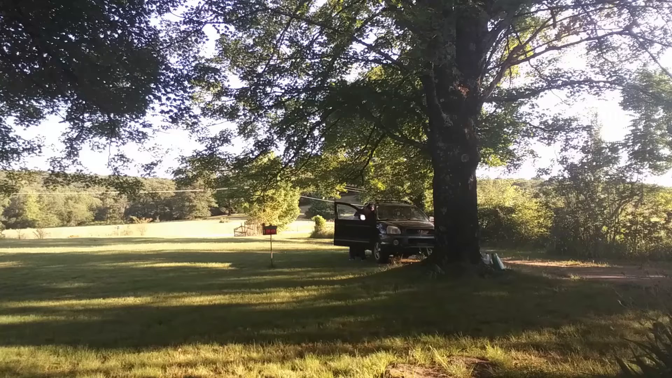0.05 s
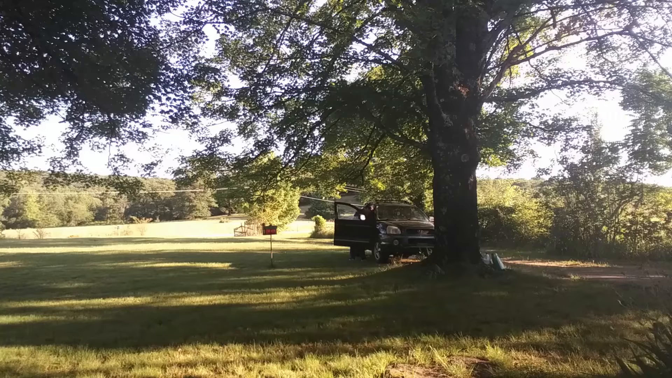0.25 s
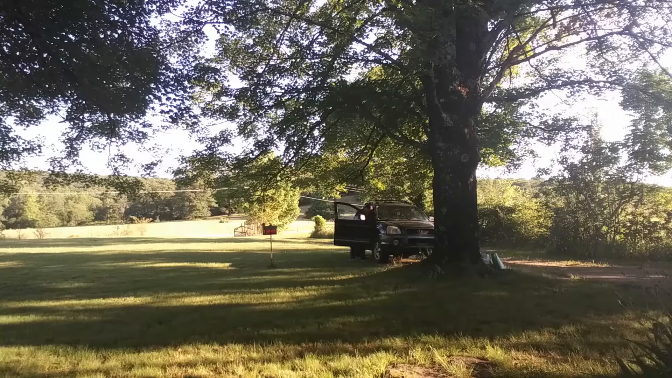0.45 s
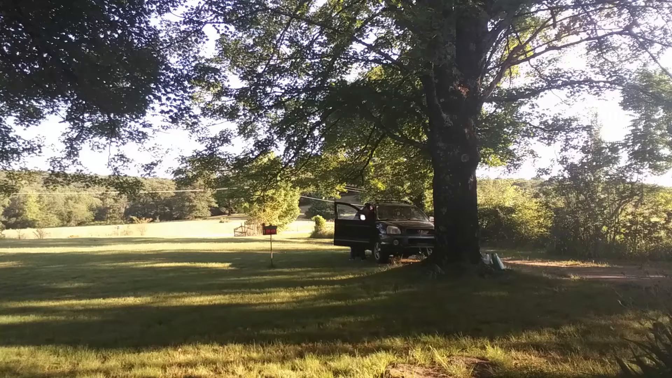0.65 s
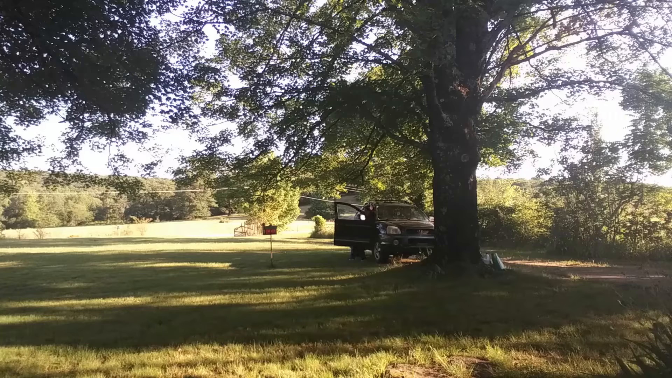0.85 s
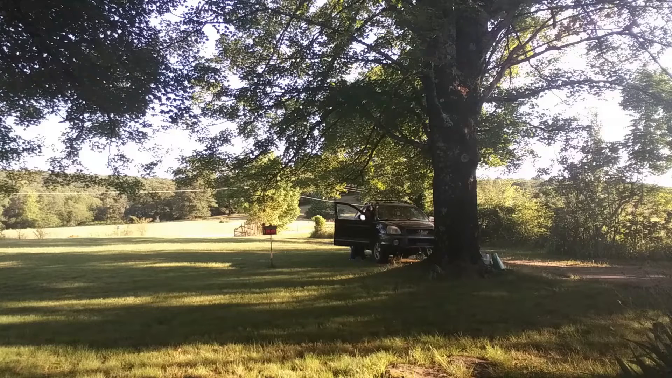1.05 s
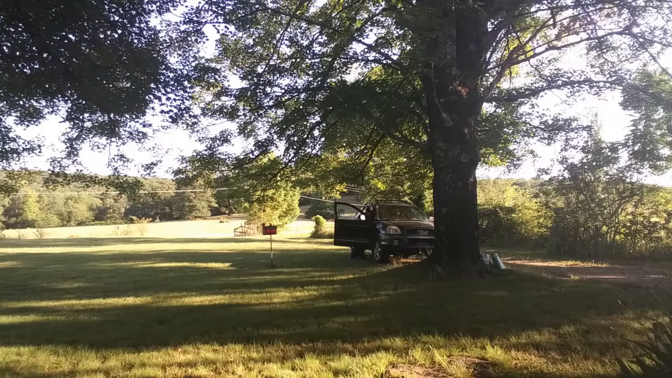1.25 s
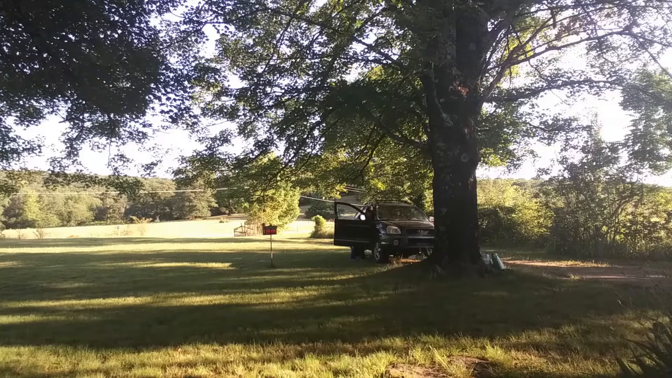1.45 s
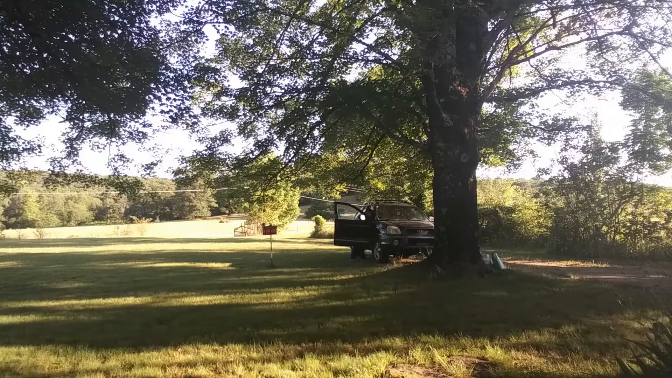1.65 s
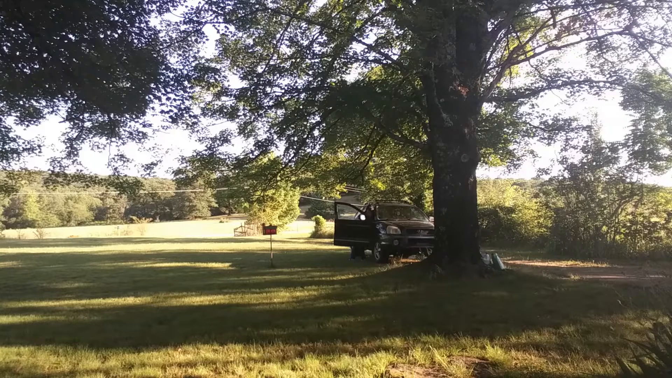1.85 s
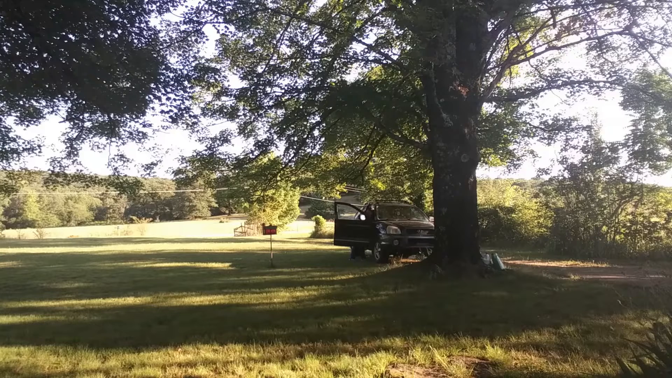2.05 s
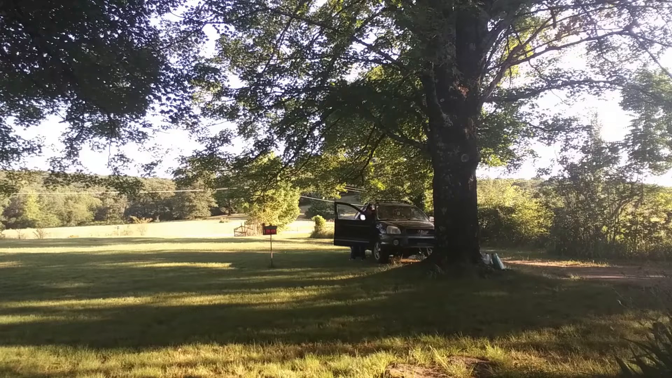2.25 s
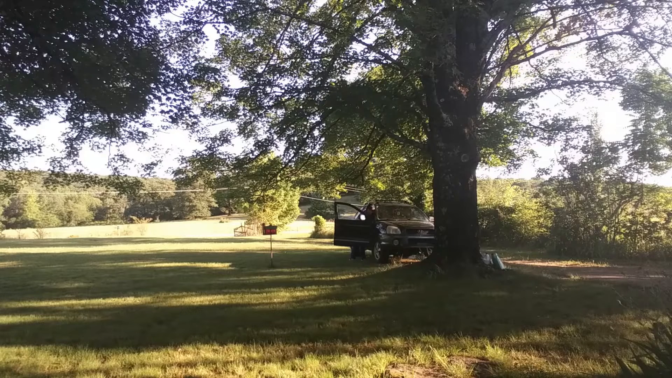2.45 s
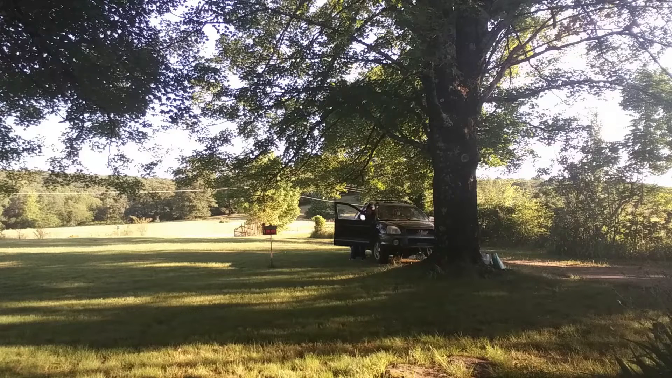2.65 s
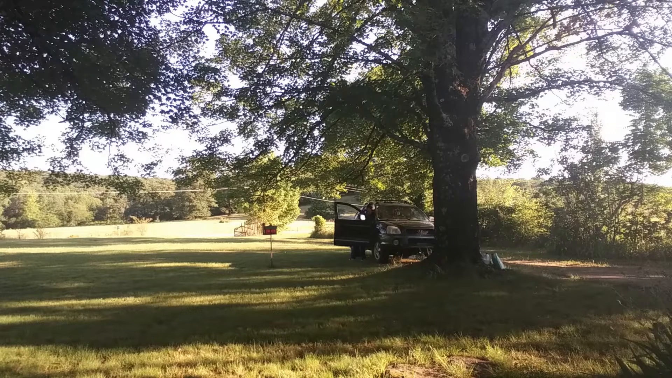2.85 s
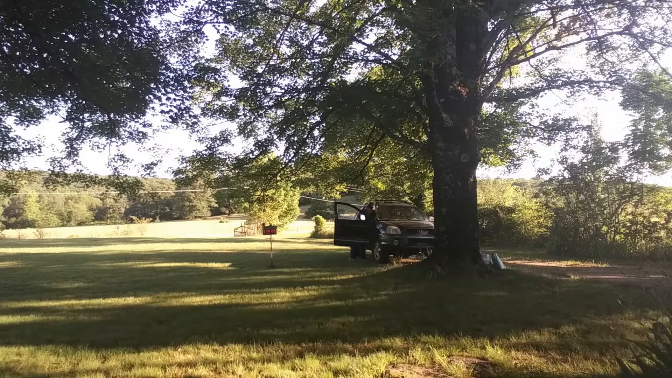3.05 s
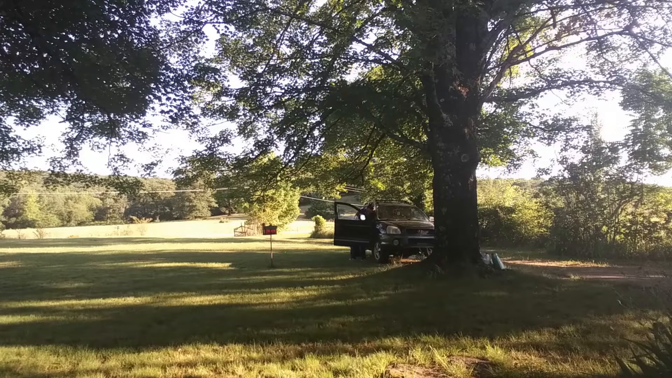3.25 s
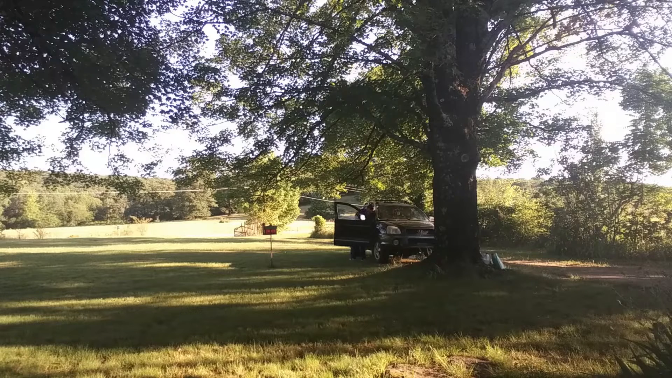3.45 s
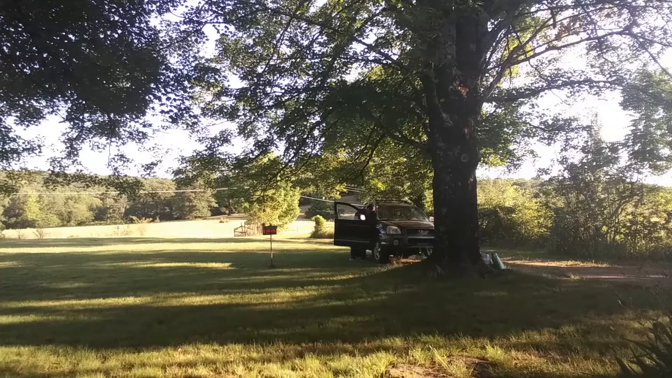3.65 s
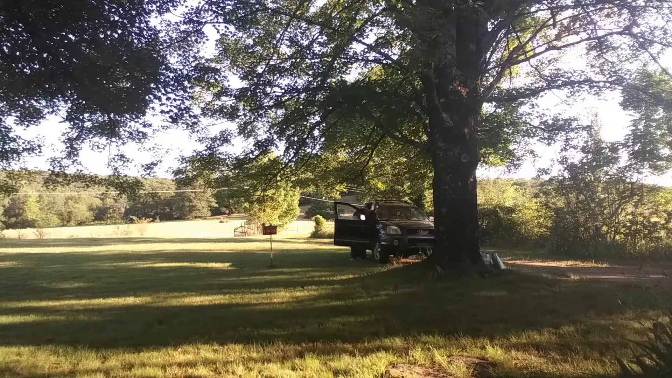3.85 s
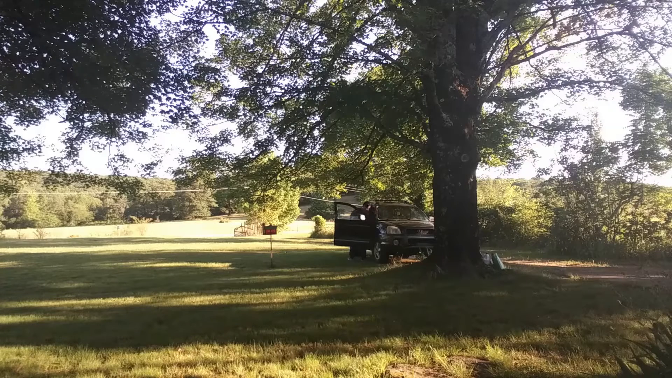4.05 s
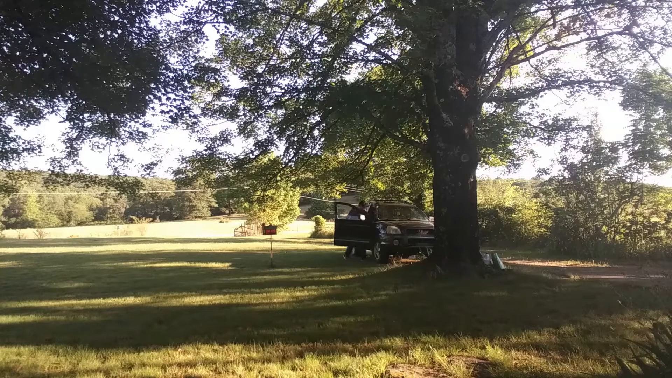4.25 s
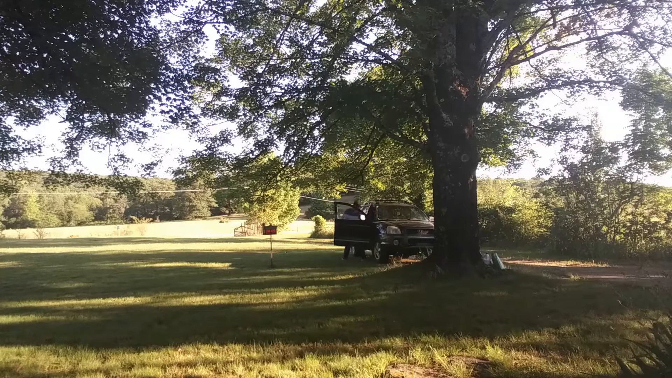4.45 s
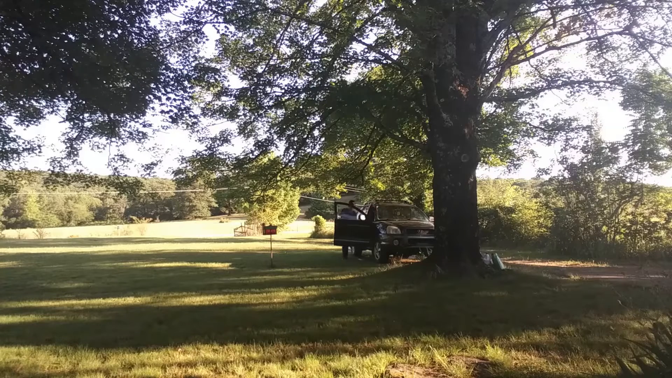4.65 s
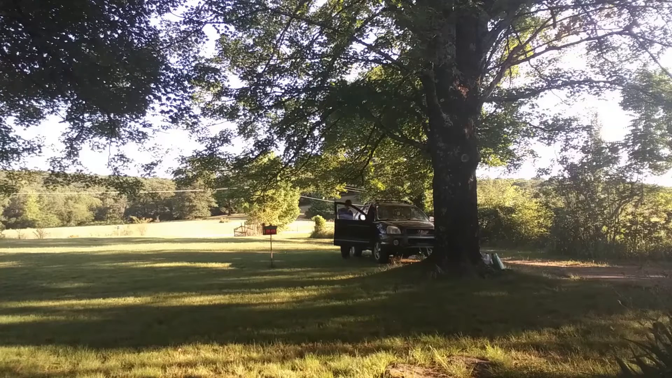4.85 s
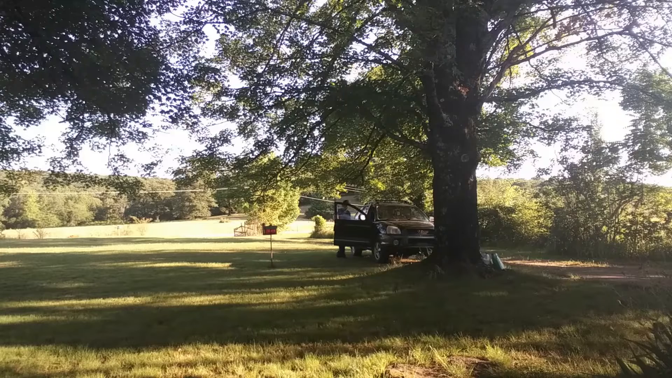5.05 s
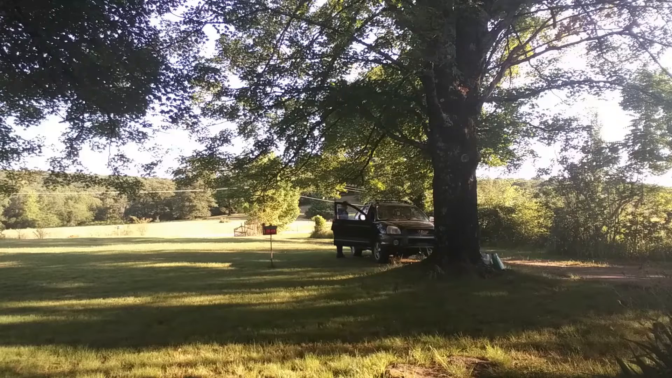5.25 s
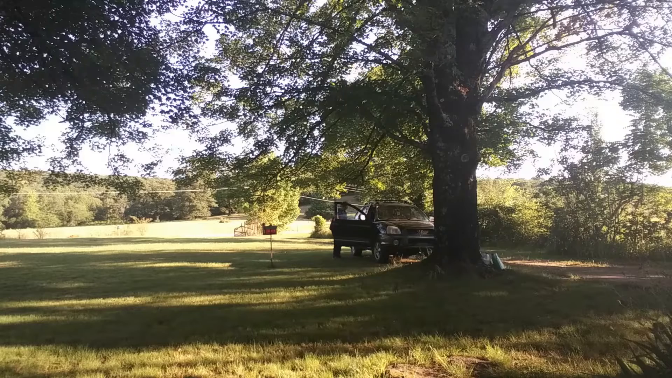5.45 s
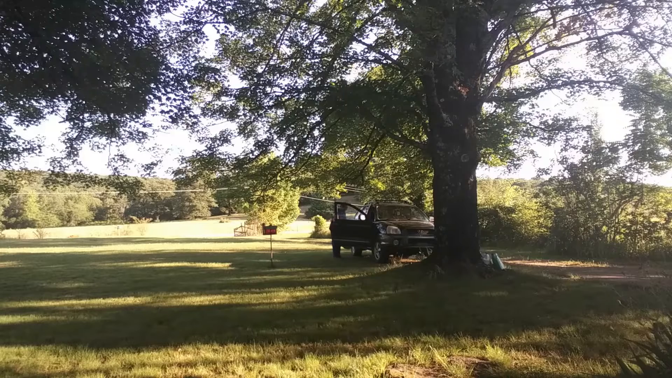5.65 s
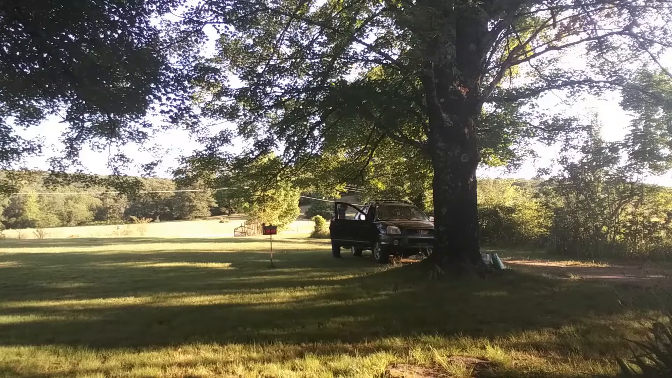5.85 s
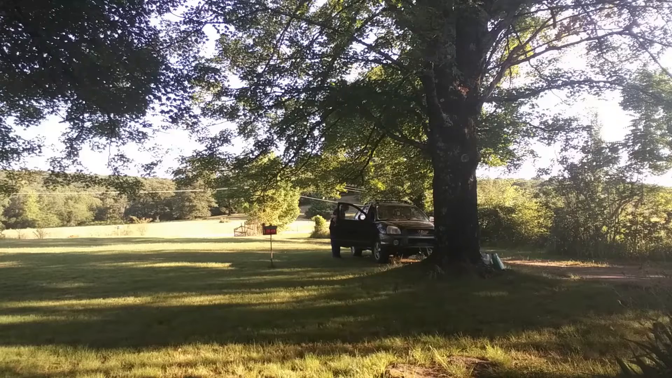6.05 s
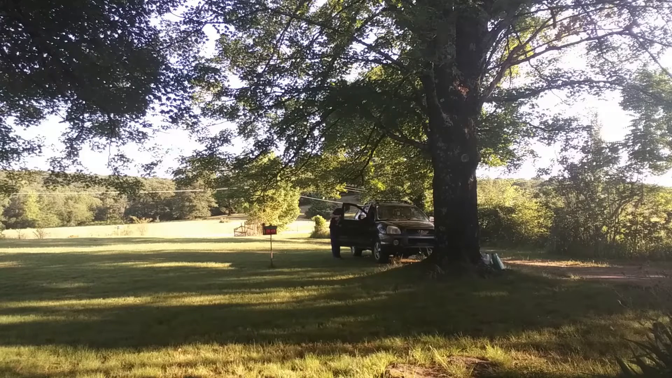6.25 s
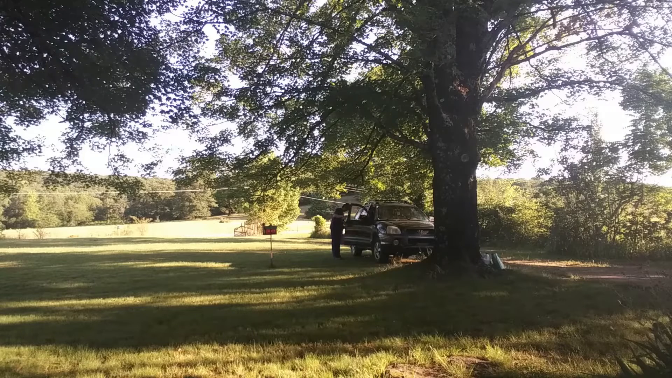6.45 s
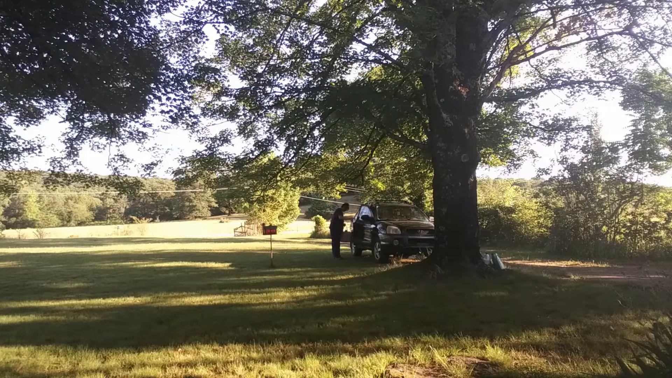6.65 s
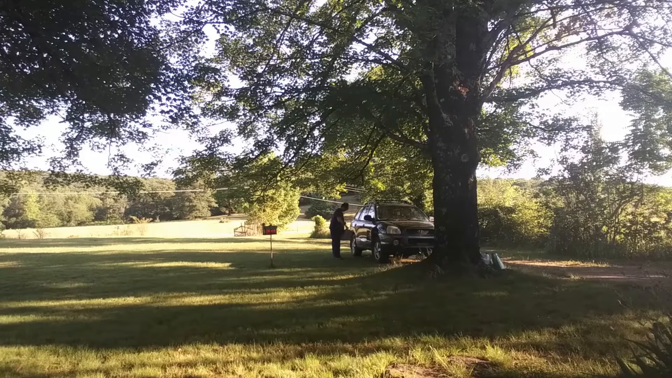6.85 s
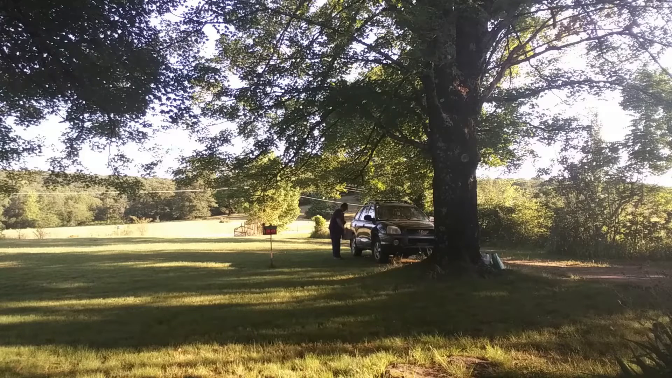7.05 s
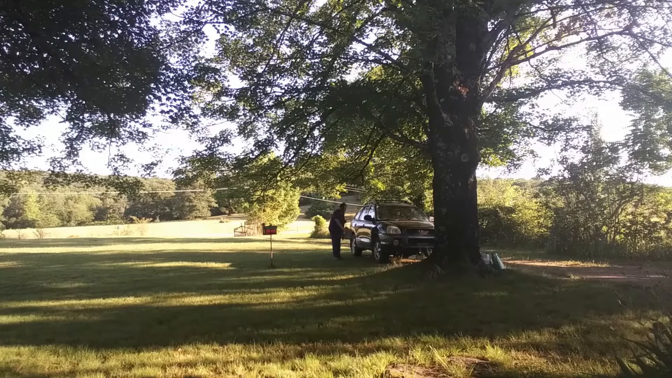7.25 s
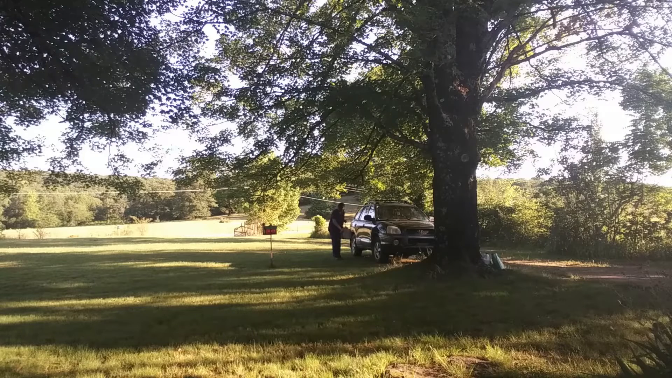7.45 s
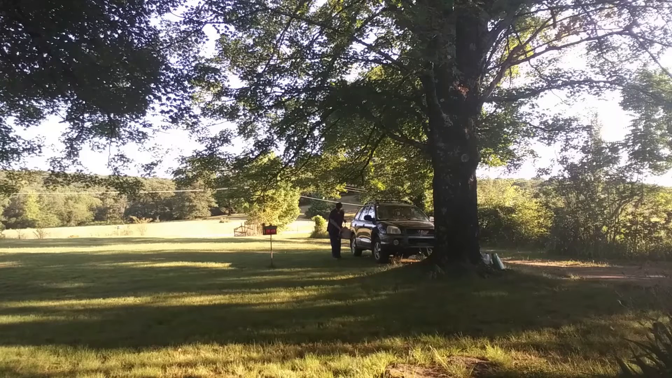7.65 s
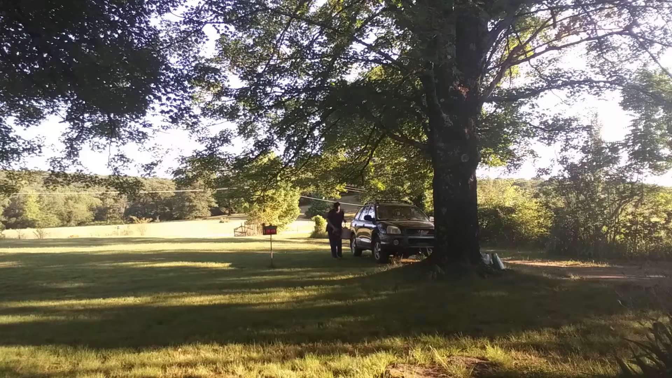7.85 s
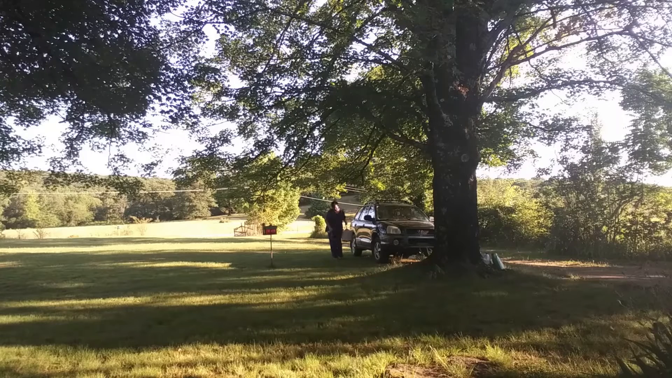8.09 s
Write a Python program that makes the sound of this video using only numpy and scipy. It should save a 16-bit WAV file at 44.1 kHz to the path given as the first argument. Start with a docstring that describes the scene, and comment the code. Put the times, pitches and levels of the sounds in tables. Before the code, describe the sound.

A pickup door slams once outdoors after faint knocks from the cab, with distant birds and insects in the quiet background.

```python
"""A quiet country yard: far birds chirp over soft air and a steady band of insects.
A scuff at a pickup, then faint knocks from its cab; a low hum swells. Near 7 s the door is slammed:
the latch touches and strikes, the door bottoms on its seal and rebounds.
Panels boom, steel clatters, trees echo. Two scuffs and a quick run of small clicks follow."""
import sys
import numpy as np
from scipy import signal
from scipy.fft import rfft, irfft
from scipy.io import wavfile
from scipy.ndimage import uniform_filter1d

SR = 44100
rng = np.random.default_rng(int(sys.argv[2]) if len(sys.argv) > 2 else 0)


def to_wav(sig):
    """Store sig (one row per channel, or 1-D mono) as 16-bit WAV at the path in sys.argv[1].

    Samples outside -1..1 are clipped; the rate is SR.
    """
    pcm = np.clip(np.atleast_2d(sig), -1, 1) * 32767
    pcm = np.round(pcm).astype(np.int16)
    wavfile.write(sys.argv[1], SR, pcm.T)  # frames by channels


N = 358091

# air wash: freq_hz, density_db
AIR_SPECTRUM = [(20, -11), (40, -8), (62, -1), (120, 2.5), (250, -3), (550, -7.5), (950, -6.5), (1500, -13),
                (3200, -15.5), (4700, -24), (7000, -22), (11000, -22.5), (15500, -21)]
# insect choruses: centre_hz, sigma_hz, level_db, throb_hz, throb_db
INSECT_BANDS = [(5806, 310, -79, 1.1, 0), (5790, 45, -84, 1.3, 0.5), (9280, 200, -93.5, 3.7, 7.5)]
# near-level whistles: start_s, length_s, pitch_hz, level_db
BIRD_WHISTLES = [(0, 0.1, 2140, -76.5), (.43, 0.13, 2178, -70.5), (0.487, 0.062, 2620, -73),
                 (.85, 0.09, 2183, -72), (1.2, 0.15, 2168, -69), (2.574, .06, 2930, -74),
                 (2.595, 0.04, 2125, -72), (2.87, .08, 1820, -75), (6.599, .2, 4240, -79.5)]
# fast falling sweeps: start_s, start_hz, level_db
BIRD_CHIPS = [(.145, 5250, -66.5), (.266, 4410, -69), (1.65, 3900, -76), (1.952, 4180, -76),
              (2.243, 4740, -78), (2.5, 4700, -78), (4.195, 4900, -72.5), (4.318, 3900, -72),
              (5.182, 3760, -69.5), (5.334, 4550, -74.5), (5.468, 4400, -71), (6.553, 4400, -72),
              (7.627, 4800, -70)]
# arched chirps: start_s, length_s, top_hz, level_db
BIRD_CHIRPS = [(3.045, .055, 4640, -74.5), (3.273, 0.049, 4880, -76), (6.226, .105, 4260, -69),
               (6.335, .12, 4370, -77)]
# drooping slurs: start_s, level_db
BIRD_SLURS = [(3.489, -73.5), (3.728, -73.5)]
# tree echo: freq_hz, t60_s
ECHO_DECAY = [(60, 1.4), (300, 1.48), (1500, 2.2), (4000, 1.54), (9000, 1.3)]
# contact noise: freq_hz, density_db
TICK_SPECTRUM = [(200, -22), (450, 3.5), (900, -14.5), (1650, 7), (2200, -10.5), (3000, -7.5), (5000, -22),
                 (8000, -24.5), (15000, -34)]
# scuffs at the truck: start_s, level_db, length_s
TRUCK_SCUFFS = [(1.379, -57.5, .08), (5.774, -54.5, 0.13), (7.385, -56, 0.076), (7.489, -58.5, 0.15)]
# cab knocks: start_s, level_db
CAB_KNOCKS = [(4.817, -67), (4.919, -59), (5.35, -57.5), (5.667, -61), (5.775, -64), (5.813, -59)]
# cab trim: freq_hz, level_db, t60_s
TRIM_MODES = [(222, -10.5, 0.2), (327, 4, 0.095), (383, 8, 0.015)]
# door blows: start_s, boom_db, contact_s, clatter_db, crack_db
DOOR_BLOWS = [(6.9701, -57, 0.00032, -36.5, -73), (6.9842, -27.5, 0.00069, -27, -26),
              (7.0083, -19, 0.0012, -36.5, -42), (7.06, -30, 0.0012, -43.5, -66)]
# door panels and cab air: freq_hz, level_db, t60_s
PANEL_MODES = [(60.4, -3, 0.24), (100.8, -5.5, 0.26), (124.1, -4.5, 0.29), (162, -4, 0.094),
               (212, -8.5, 0.27), (289, 5.5, 0.089), (327, 4.5, 0.076), (366.8, -7.5, 0.21),
               (428.4, 3, 0.084), (477, -3, 0.16), (500, -7, 0.16), (562.5, -14, .23)]
# door frame and striker: freq_hz, level_db, t60_s
FRAME_MODES = [(725, -5, .25), (902, -4, .16), (1185, -3, .3), (1280, -4, .4), (1557, -2, .27),
               (1805, 0, .24), (1916, -4, .23), (2125, -1, .3), (2234, -4, .28), (2378, -4, .25),
               (2907, -3, .25), (3175, -7, .28), (3429, -7, .27), (3817, -5, .2), (4775, -6, .13),
               (6309, -12, .16)]
# dense small door modes: freq_hz, density_db
CLATTER_SPECTRUM = [(100, -10), (450, 5), (640, -4.5), (1000, -1.5), (1700, 0.5), (2600, -6.5), (3800, -9),
                    (4900, -23), (6500, -19.5), (8500, -27.5), (15000, -47)]
# their decay: freq_hz, t60_s
CLATTER_DECAY = [(500, 0.32), (1500, 0.24), (3500, .28), (6000, 0.21), (12000, 0.23)]
# latch snapping home: freq_hz, density_db
LATCH_SPECTRUM = [(200, -14), (600, 5), (950, 4), (1500, 1.5), (3000, -9.5), (4600, -1.5), (5300, -12),
                  (6700, -4.5), (8000, -19.5), (15000, -40)]
# clicks after the slam: start_s, level_db
LATE_CLICKS = [(7.703, -62), (7.716, -52), (7.738, -50)]


def amp(db):
    """Decibels to gain."""
    return 10 ** (np.asarray(db) / 20)


def unit_rms(x):
    """Scale to rms 1."""
    return x / np.sqrt(np.mean(x ** 2) + 1e-20)


def lookup(points, hz):
    """Interpolate a table over log frequency."""
    table_hz, value = np.transpose(points)
    return np.interp(np.log(hz + 1), np.log(table_hz + 1), value)


def add(mix, start_s, sound):
    """Mix a sound in at start_s."""
    part = mix[max(round(start_s * SR), 0):][:len(sound)]
    part += sound[:len(part)]


def noise(spectrum, size):
    """Coloured noise, rms 1."""
    hz = np.fft.rfftfreq(size, 1 / SR)
    phasors = np.exp(2j * np.pi * rng.random(len(hz)))
    return unit_rms(irfft(phasors * amp(lookup(spectrum, hz)), size))


def band(centre_hz, sigma_hz):
    """Gaussian band of noise, rms 1."""
    hz = np.fft.rfftfreq(N, 1 / SR)
    bell = np.exp(-.5 * ((hz - centre_hz) / sigma_hz) ** 2)
    return unit_rms(irfft(rfft(rng.standard_normal(N)) * bell, N))


def decay(t60_s):
    """Exponential decay, 1 s long."""
    return np.exp(-np.log(1000) * np.arange(SR) / SR / t60_s)


def decay_bands(x, t60_table):
    """Decay each band at its own rate."""
    hz, t, bins = signal.stft(x, SR, nperseg=256)
    envelopes = 1000 ** (-t / lookup(t60_table, hz)[:, None])
    return signal.istft(bins * envelopes, SR)[1][:len(x)]


def air(level_db=-66, sway_db=0.4):
    """Soft wash of air, gently swaying."""
    return amp(level_db - sway_db * band(0, 1.2)) * noise(AIR_SPECTRUM, N)


def insects():
    """Far choruses in narrow bands, steady or throbbing."""
    out, t = np.zeros(N), np.arange(N) / SR
    for centre_hz, sigma_hz, level_db, throb_hz, throb_db in INSECT_BANDS:
        throb = np.sin(2 * np.pi * throb_hz * t + band(0, 0.82))
        out += amp(level_db + throb_db * throb) * band(centre_hz, sigma_hz)
    return out


def ramp(length_s):
    """0 to 1 over a note."""
    return np.linspace(0, 1, int(length_s * SR))


def bird_note(path_hz, waver=.04):
    """Thin whistle swelling and fading along a pitch path; wide glides are rougher."""
    jitter = unit_rms(uniform_filter1d(rng.standard_normal(SR), size=120))[:len(path_hz)]
    pitch_hz = path_hz + waver * np.ptp(path_hz) * jitter
    envelope = np.sqrt(abs(np.sin(np.linspace(0, np.pi, len(path_hz)))))
    return envelope * np.sin(2 * np.pi * np.cumsum(pitch_hz) / SR)


def birds(sag_hz=30, chip_end_hz=2500, fall_hz_per_s=39000, arch_hz=1195,
          slur_s=.125, slur_hz=4060, droop_hz=963, flutter_db=2.5):
    """Whistles, chips, chirps and slurs, fluttering through the leaves."""
    out = np.zeros(N)
    for start_s, length_s, pitch_hz, level_db in BIRD_WHISTLES:
        add(out, start_s, amp(level_db) * bird_note(pitch_hz - sag_hz * ramp(length_s) ** 2))
    for start_s, start_hz, level_db in BIRD_CHIPS:
        path_hz = np.arange(start_hz, chip_end_hz, -fall_hz_per_s / SR)
        add(out, start_s, amp(level_db) * bird_note(path_hz))
    for start_s, length_s, top_hz, level_db in BIRD_CHIRPS:
        path_hz = top_hz - arch_hz * (2 * ramp(length_s) - 1) ** 2
        add(out, start_s, amp(level_db) * bird_note(path_hz))
    for start_s, level_db in BIRD_SLURS:
        add(out, start_s, amp(level_db) * bird_note(slur_hz - droop_hz * ramp(slur_s) ** 2))
    return out * amp(flutter_db * band(0, 50))


def tree_echo(x, wet_db, build_s, taps_per_s=2000):
    """Direct sound plus a thin tail scattered by trunks and leaves."""
    taps = rng.standard_normal(SR) * (rng.random(SR) < taps_per_s / SR)
    tail = decay_bands(taps, ECHO_DECAY) * (1 - decay(build_s))
    return x + amp(wet_db) * signal.fftconvolve(x, tail / np.linalg.norm(tail))[:N]


def tick(t60_s, build_s):
    """Dry burst of contact noise."""
    return noise(TICK_SPECTRUM, SR) * decay(t60_s) * (1 - decay(build_s))


def scuffs(build_ratio=0.42):
    """Contact noise with a slow onset."""
    out = np.zeros(N)
    for start_s, level_db, length_s in TRUCK_SCUFFS:
        add(out, start_s, amp(level_db) * tick(length_s, build_ratio * length_s))
    return out


def ring(modes, scatter_cycles=0):
    """Struck modes, 1 s long; neighbours swing opposite ways unless scattered in phase."""
    out, t = np.zeros(SR), np.arange(SR) / SR
    for k, (freq_hz, level_db, t60_s) in enumerate(modes):
        cycles = freq_hz * t + scatter_cycles * rng.random()
        out += (-1) ** k * amp(level_db) * decay(t60_s) * np.sin(2 * np.pi * cycles)
    return out


def knocks(tick_db=-10.5):
    """Dull thuds of cab trim, each topped by a tick."""
    out, thud = np.zeros(N), ring(TRIM_MODES)
    for start_s, level_db in CAB_KNOCKS:
        add(out, start_s, amp(level_db) * (thud + amp(tick_db) * tick(t60_s=0.092, build_s=.007)))
    return out


def hum(pitch_hz=312, level_db=-76.5, start_s=5.8, end_s=7.2, fade_s=.4):
    """Faint low hum swelling before the slam."""
    t = np.arange(N) / SR
    swell = np.clip(np.minimum(t - start_s, end_s - t) / fade_s, 0, 1)
    return amp(level_db) * swell * band(pitch_hz, sigma_hz=4.4)


def door_slam(frame_db=-15, spread_s=0.011, align_s=.0036, crack_t60_s=.048, snap_s=.002):
    """Each blow sounds a low panel boom together with a steel clatter and latch crack."""
    out, panels = np.zeros(N), ring(PANEL_MODES)
    t = np.arange(SR) / SR
    for start_s, boom_db, contact_s, clatter_db, crack_db in DOOR_BLOWS:
        push = t * np.exp(-np.pi * t / contact_s)  # longer contact, duller boom
        boom = signal.fftconvolve(panels, push / push.sum())[:SR]
        add(out, start_s, amp(boom_db) * boom)
        clatter = decay_bands(noise(CLATTER_SPECTRUM, SR), CLATTER_DECAY)
        frame = amp(frame_db) * ring(FRAME_MODES, scatter_cycles=1)
        steel = (clatter + frame) * (1 - decay(spread_s))  # the shock takes time to spread
        crack = noise(LATCH_SPECTRUM, SR) * decay(crack_t60_s) * (1 - decay(snap_s))
        add(out, start_s + align_s, amp(clatter_db) * steel + amp(crack_db) * crack)
    return out


def clicks(thud_db=-6.5):
    """Sharp ticks, each over a light thud of trim."""
    out, thud = np.zeros(N), amp(thud_db) * ring(TRIM_MODES)
    for start_s, level_db in LATE_CLICKS:
        add(out, start_s, amp(level_db) * (thud + tick(t60_s=0.052, build_s=0.0022)))
    return out


def scene():
    """Birds deep in the trees, truck across the lawn; mono."""
    song = tree_echo(birds(), wet_db=-4.5, build_s=0.0096)
    contacts = tree_echo(scuffs() + knocks() + clicks(), wet_db=-10.5, build_s=0.044)
    slam = tree_echo(door_slam(), wet_db=-29.5, build_s=0.19)
    return (air() + insects() + song + contacts + hum() + slam)[None]


def record(dry, low_hz=50, high_hz=15800):
    """Microphone bass roll-off, then the band limit."""
    highpass = signal.butter(4, low_hz, "highpass", fs=SR, output="sos")
    lowpass = signal.firwin(511, high_hz, window=("kaiser", 9), fs=SR)
    return signal.oaconvolve(signal.sosfilt(highpass, dry), lowpass[None], "same")


dry = scene()
out = record(dry)
to_wav(out)
```